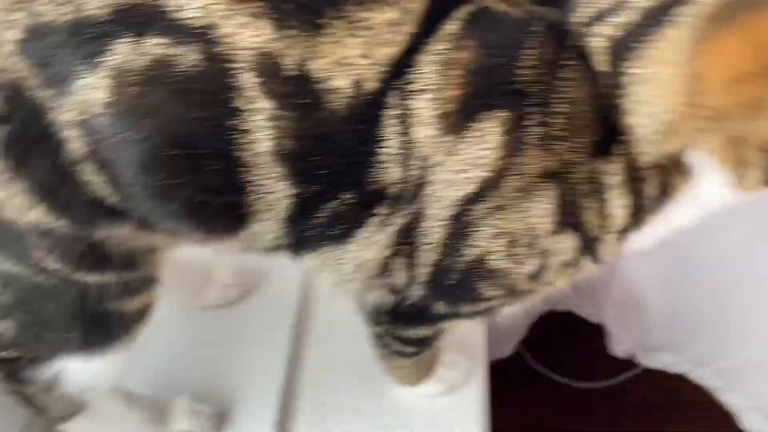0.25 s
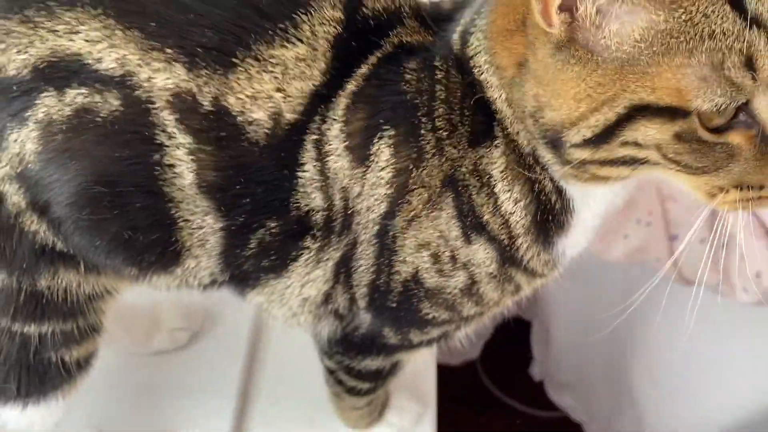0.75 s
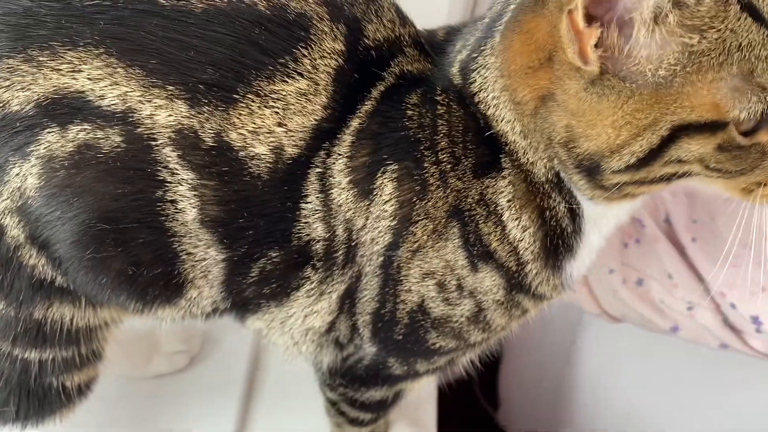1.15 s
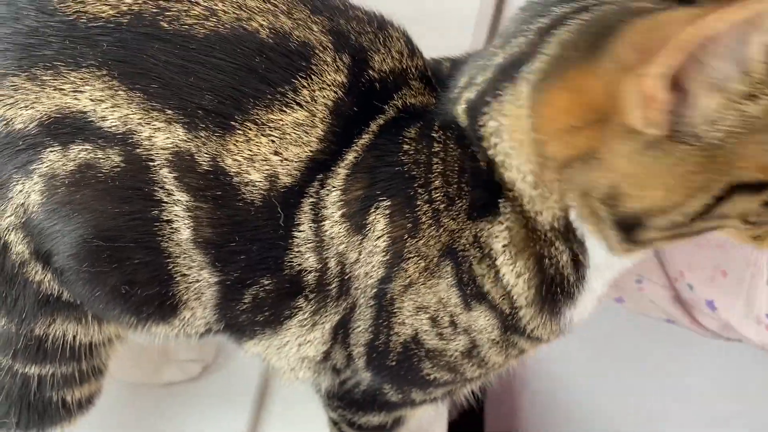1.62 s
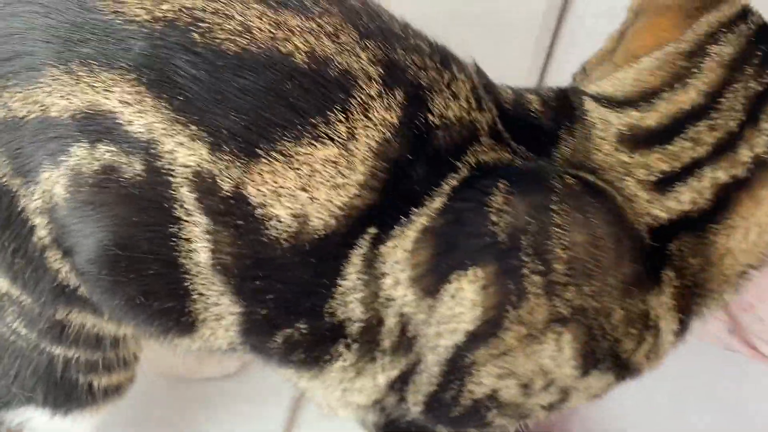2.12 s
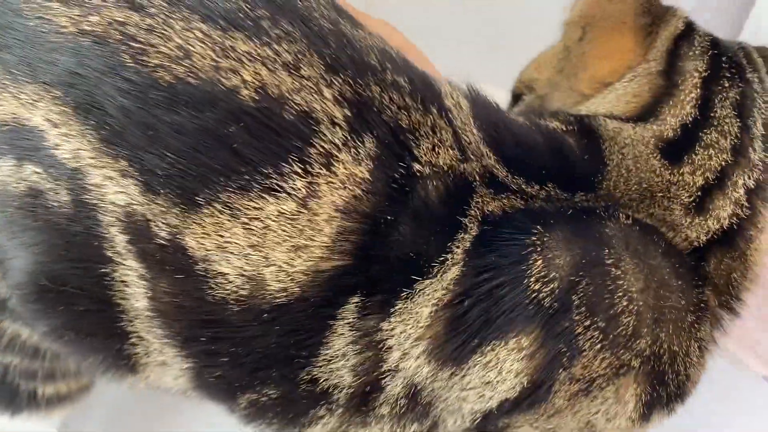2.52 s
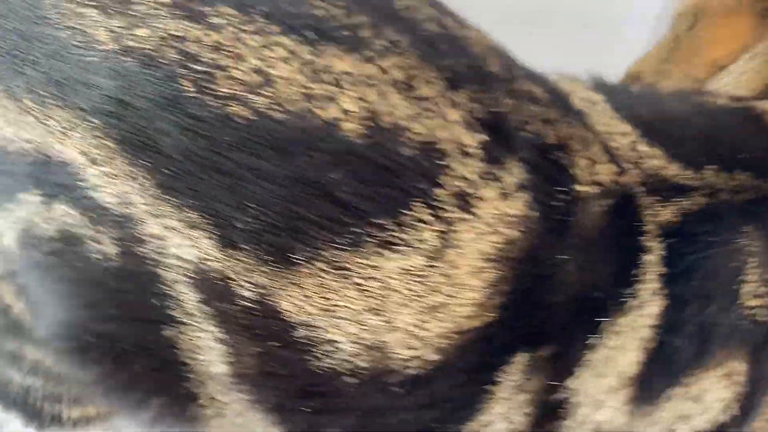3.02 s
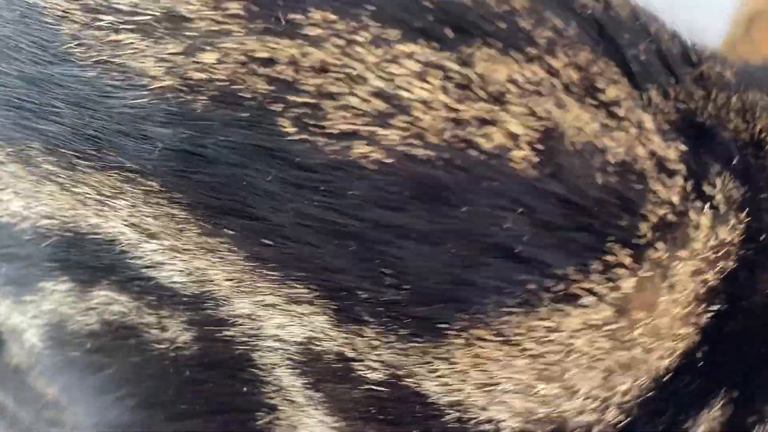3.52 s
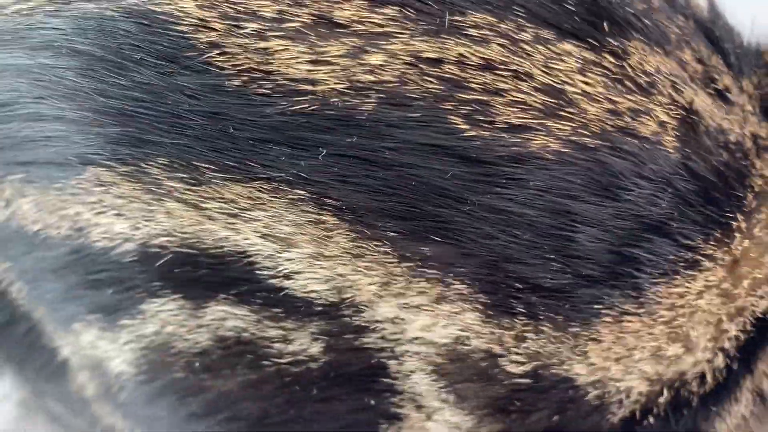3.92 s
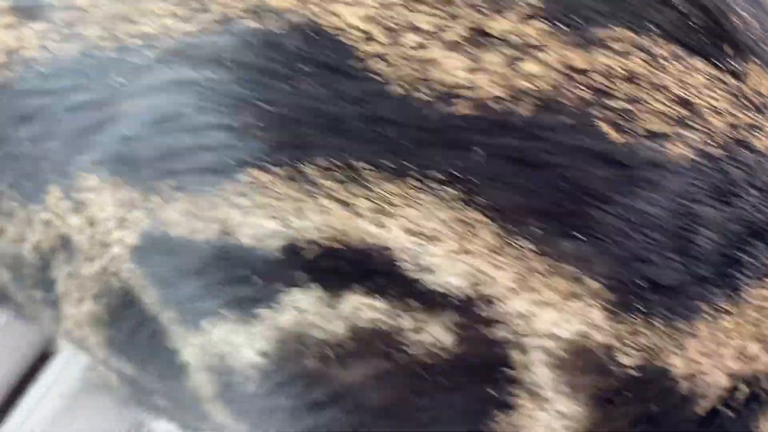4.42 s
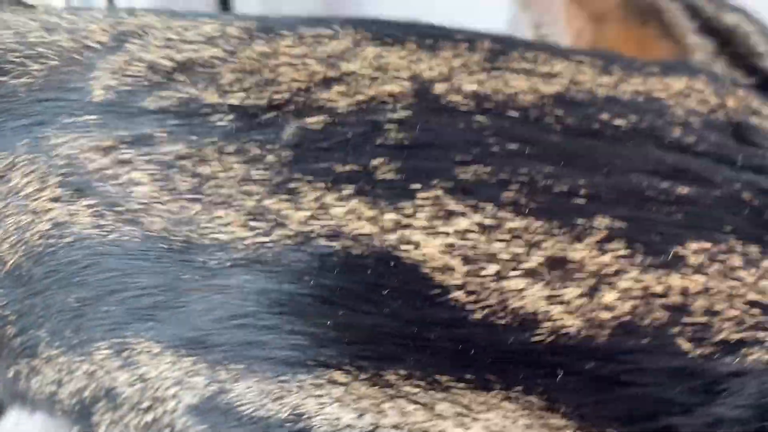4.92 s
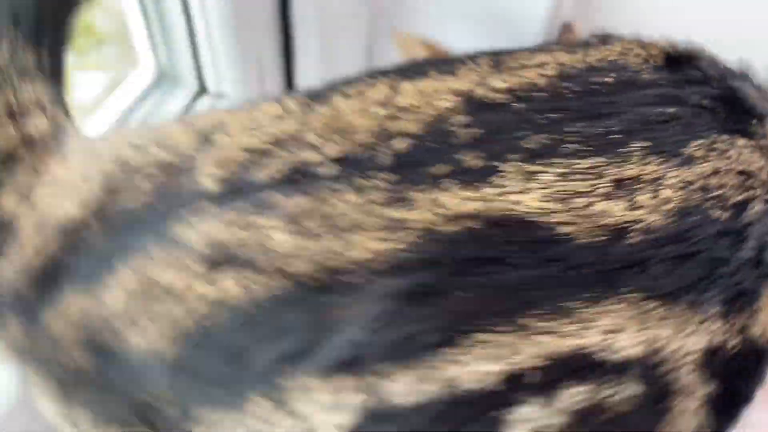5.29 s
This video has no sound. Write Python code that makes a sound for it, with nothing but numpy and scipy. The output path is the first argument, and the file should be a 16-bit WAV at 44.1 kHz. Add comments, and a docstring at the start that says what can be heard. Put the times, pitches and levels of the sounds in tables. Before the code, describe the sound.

Close, low, throbbing purring runs throughout without pause, changing in strength with each breath in and out and getting stronger in the second half. Fur brushes softly around it. The hand knocks the microphone near the start and near the end. Two bright distant cracks, two thin gliding whistles and scattered tiny ticks punctuate it, over a faint low indoor room noise.

```python
"""A cat purrs right at a hand-held microphone indoors, louder as time goes on, while its fur rustles.
At first the hand shifts and bumps the device. The nose hisses in the rhythm of the purr at 0.5 s and 1.4 s,
with a sharp snap at 1.4 s. A faint high whistle glides at 1.8 s, a second snap rings at 3.7 s,
a second whistle follows at 4.1 s, and the hand bumps again at 5.2 s. Small ticks are scattered throughout.
The purr is made of pulses, the air, fur and room of filtered noise, the whistles of gliding sines."""
import sys
import numpy as np
from scipy import signal
from scipy.fft import rfft, irfft
from scipy.io import wavfile
from scipy.ndimage import uniform_filter1d

SR = 44100
rng = np.random.default_rng(int(sys.argv[2]) if len(sys.argv) > 2 else 0)


def pcm_store(signal):
    """Save signal as 16-bit PCM."""
    levels = np.round(np.clip(np.atleast_2d(signal), -1, 1) * 32767)
    wavfile.write(sys.argv[1], SR, levels.astype(np.int16).T)


N = 244755
T = np.arange(N) / SR  # the time of every sample [s]
HZ = np.fft.rfftfreq(N, 1 / SR)  # the frequencies of the whole sound's spectrum [Hz]

# The cat purrs on every breath, in and out:
# (time [s], beats [count], effort [dB], change over the breath [dB], brightness [dB],
#  gap to the second thump [s], size of the second thump [share of the first])
BREATHS = [(0.0215, 12, -57, 2, -2, .011, 1), (0.4449, 11, -53, 0, 3, .011, .55),
           (.83, 7, -52, 13, -1, 0.0093, 0.56), (1.0924, 7, -57, -6, 1, 0.0085, 0.8),
           (1.347, 12, -52.5, -3.5, 3.5, 0.01048, .45), (1.7586, 13, -50, 1, -1.5, 0.011, 0.5),
           (2.2099, 5, -49, -5.5, -2, 0.01, .55), (2.381, 6, -48, -6, -0.5, 0.013, 0.67),
           (2.590, 6, -51.5, -3, 0.5, .009, .5), (2.795, 6, -53, 4, -4.5, .011, 0.37),
           (3.008, 5, -46.5, -2.5, -4.5, 0.011, 0.43), (3.1845, 9, -48.5, -0.5, 0.5, .0116, .85),
           (3.4984, 11, -46, 2, 1.5, 0.012, 0.44), (3.887, 10, -48.5, 2.5, 0, .0108, .7),
           (4.234, 17, -48.5, 1, 4, .012, 0.43), (4.8273, 12, -48.5, -5.5, 0, 0.01106, 0.72),
           (5.248, 9, -47.5, -0.5, -1, 0.011, 0.41)]
LAST_BREATH_ENDS_S, RELEASE_S = 5.578, 0.063  # a breath sinks back over the release time


def purr(shut, delay_cycles=1.077, flutter=0.029, air_above_hz=110, slaps_within_s=0.024, slap_count=4):
    """Each beat of the larynx is a double thump, which the body colours and delays most in the bass."""
    # colour of one thump: (frequency [Hz], level [dB])
    thump = [(25, -24), (50, -5.5), (85, -0.5), (120, 3), (180, 0), (230, -6), (300, -11.5), (420, -12.5),
             (520, -10.5), (620, -17), (750, -32), (950, -55.5), (1300, -65), (4000, -130)]
    *_, gap, second_size = breath_at(shut)
    chance = rng.standard_normal((len(shut), 3))
    slip, first_db, second_db = (chance * [.0004, .8, 1.4]).T  # [s], [dB], [dB]

    # the folds never shut evenly: a few small slaps follow each beat at random
    slaps = shut[:, None] + rng.uniform(0, slaps_within_s, (len(shut), slap_count))
    slap_sizes = .07 * rng.standard_normal(slaps.shape)

    times = np.r_[shut, shut + gap + slip, slaps.ravel()]
    sizes = np.r_[amp(first_db), second_size * amp(second_db), slap_sizes.ravel()]
    inside = (times >= 0) & (times < T[-1])
    pulses = np.bincount((times[inside] * SR).astype(int), sizes[inside], N)

    # turbulent air follows every pulse and fades with a time constant of 9.5 ms
    air_level = signal.lfilter([1], [1, -np.exp(-1 / (0.0095 * SR))], pulses)
    air = air_level * rng.standard_normal(N)
    # the air is too light to shake the chest, so the bass stays clean
    air_share = HZ ** 3 / (HZ ** 3 + air_above_hz ** 3)
    # each frequency arrives about one of its own cycles late
    late = np.exp(-2j * np.pi * delay_cycles * np.log((HZ + 1) / 150))
    thumps = (rfft(pulses) + flutter * rfft(air) * air_share) * amp(across(thump, HZ)[0]) * late

    # four registers, split at 100, 265 and 440 Hz, each with its own level
    flank, chest, throat = (1 / (1 + (HZ / hz) ** 12) for hz in (100, 265, 440))
    parts = (flank, chest - flank, throat - chest, 1 - throat)
    return sum(amp(db) * unit(irfft(thumps * part, N)) for db, part in zip(registers(), parts))


def beats(jitter_s=.0002):
    """The moments at which the vocal folds shut: evenly spread over each breath, with a little jitter."""
    ends = [row[0] for row in BREATHS[1:]] + [LAST_BREATH_ENDS_S]
    shut = np.concatenate([np.linspace(start, end, round(count), endpoint=False)
                           for (start, count, *_), end in zip(BREATHS, ends)])
    return shut + jitter_s * rng.standard_normal(len(shut))


def breath_at(t, turn_before_s=.018):
    """For times t: seconds since and until a turn of the breath, then that breath's columns from effort on."""
    rows = np.array(BREATHS)
    turns = np.r_[rows[:, 0] - turn_before_s, LAST_BREATH_ENDS_S + RELEASE_S]
    k = np.clip(np.searchsorted(turns, t) - 1, 0, len(rows) - 1)
    return np.maximum(t - turns[k], 0), turns[k + 1] - t, *rows[k, 2:].T


def registers(attack_s=0.045, lull_db=-8, upper_follow=1.14):
    """Levels in dB of flank, chest, throat and nose: each breath swells from a lull and sinks back into it."""
    # the colour changes as the flank comes nearer and the head turns, relative to the chest:
    # (time [s], flank [dB], throat [dB], nose [dB])
    nearness = [(.15, -3, -14.5, -16.5), (.6, -12, -48, -16.5), (1.4, -5, -32, -18), (1.9, -13.5, -18, -31),
                (3.0, -3.5, -8.5, -22.5), (3.45, -7, -12.5, -23), (3.8, -2.5, -13, -14),
                (4.6, -9, -13.5, -20), (5.05, -11, -7, -13.5), (5.4, -11, -5, -4)]
    since, until, effort, change, bright, _, _ = breath_at(T)
    lull = lull_db * np.maximum(np.maximum(1 - since / attack_s, 1 - until / RELEASE_S), 0)
    shape = lull + change * (since / (since + until) - .5)
    low = effort + shape
    high = effort + bright + upper_follow * shape  # the upper registers swing further
    flank, throat, nose = along(nearness, T)
    levels = np.array([low + flank, low, high + throat, high + nose])
    return uniform_filter1d(levels, size=441)  # smoothed over 10 ms


def sniffs(shut, puff_at=0.88, puff_width=0.078, steady=0.35, second=0.65):
    """Air hisses through the nose in two puffs a beat, while the folds stand open."""
    # when the nose hisses: (time [s], length [s], level [dB])
    hisses = [(.5, .31, -71.5), (1.385, .27, -76)]
    # colour of the air in the nose: (frequency [Hz], level [dB])
    nose = [(900, -38), (1250, 0.5), (1600, 14), (2000, -1), (3000, -12), (4400, -9.5), (5400, 0.5),
            (6500, -11), (7800, 10), (9000, -13), (10500, 4), (12500, -18), (16000, -39)]
    turn = np.interp(T, shut, np.arange(len(shut))) - puff_at  # place in the rhythm [beats]
    # the weaker puff comes half a beat after the strong one
    strong, weak = (np.exp(-(np.sin(np.pi * (turn - late)) / (np.pi * puff_width)) ** 2) for late in (0, .5))
    puffs = unit(steady + strong + second * weak)
    level = sum(amp(db) * swell(s, length) for s, length, db in hisses)
    return level * colour(patchy(noise(0.5), patchy_db=4.0) * puffs, nose)


def fur(rub_db=-77, fizz_db=-88.5, grain_db=-0.96):
    """Hairs brush past each other: steady noise in a grainy rub and a fine fizz, with strokes on top."""
    # colours of the rub and of the fizz: (frequency [Hz], level [dB])
    rub_colour, fizz_colour = [(300, 17), (800, 8), (1500, 3.5), (2500, 1.5), (4500, -4), (6500, -5),
                               (8000, -18.5), (12000, -39.5)], [(3000, -7.5), (6000, -5.5), (8000, -1), (11000, -2.5),
                                            (13000, -3.5), (16000, -11.5)]
    # longer strokes: (time [s], length [s], soft rub [dB], fine fizz [dB])
    strokes = [(0.022, 0.2, -71.5, -86.5), (1.33, 0.41, -72, -83.5), (2.42, 0.34, -75.5, -97),
               (2.8, 0.17, -95, -78), (4.029, 0.24, -73.5, -95), (4.85, 0.37, -72.5, -94),
               (5.08, .08, -84, -76.5), (5.19, 0.45, -77, -83.5)]
    # short brushes and thin hisses: (time [s], length [s], level [dB], centre [Hz], width [octaves])
    short_brushes = [(0.07, 0.097, -75.5, 3240, 0.28), (0.23, 0.14, -85.5, 6600, 0.062),
                     (0.749, 0.054, -73.5, 954, 0.082), (0.903, 0.2, -83.5, 1620, 0.18),
                     (1.702, 0.35, -73, 670, 0.26), (1.845, 0.032, -75, 980, 0.15),
                     (1.826, 0.24, -78, 2000, 0.61), (1.901, 0.088, -70.5, 5930, 0.26),
                     (2.19, 0.16, -84, 1630, 0.16), (2.44, 0.29, -85.5, 6680, 0.028),
                     (2.72, 0.21, -82, 2600, 0.65)]
    rub = np.hypot(amp(rub_db), sum(amp(db) * swell(s, length) for s, length, db, _ in strokes))
    fizz = np.hypot(amp(fizz_db), sum(amp(db) * swell(s, length) for s, length, _, db in strokes))
    soft = colour(patchy(noise(0.3), patchy_db=3.0) * unit(amp(grain_db * drift(110))), rub_colour)
    fine = colour(patchy(noise(1.0), patchy_db=3.0), fizz_colour)
    grain = patchy(noise(0.41), patchy_db=3.5)
    brushes = sum(amp(db) * swell(s, length) * band(grain, hz, octaves)
                  for s, length, db, hz, octaves in short_brushes)
    return rub * soft + fizz * fine + brushes


def grip_shifts():
    """The hand shifts on the device in low rumbles: bands of noise that swell and sink."""
    # (time [s], length [s], level [dB], centre [Hz], width [Hz])
    shifts = [(0.062, 0.21, -44, 99.8, 34), (1.904, 0.11, -51, 52, 50), (2.162, 0.11, -64, 45.7, 40.23),
              (4.892, 0.12, -48.5, 66.3, 70), (4.955, 0.33, -53, 186, 258), (5.192, 0.085, -55, 57, 51)]
    out = np.zeros(N)
    for s, length, db, hz, width in shifts:
        low_band = 1 / (1 + (2 * (HZ - hz) / width) ** 4)
        rumble = swell(s, length) * irfft(rfft(rng.standard_normal(N)) * low_band, N)
        # the level holds for the rumble's own length, not for the whole sound
        out += amp(db) * unit(rumble) * np.sqrt(length / T[-1])
    return out


def bumps():
    """Two soft bumps ring the case of the device in a few dying sines; a longer contact is duller."""
    # (time [s], level before softening [dB], contact time [s])
    knocks = [(0.207, -26.5, 0.0011), (5.2062, -24.5, 0.0012)]
    # ringing of the case: (frequency [Hz], level [dB], time to fall 60 dB [s])
    case = [(313, 4.5, 0.0065), (547, 0, 0.0098), (1077, -29, 0.071), (1930, -8, 0.022)]
    out = np.zeros(N)
    for s, db, contact in knocks:
        ring = np.zeros(N)
        for k, (hz, mode_db, t60) in enumerate(case):
            ring += (-1) ** k * amp(db + mode_db) * dying(s, t60) * np.sin(2 * np.pi * hz * (T - s))
        push = np.hanning(round(contact * SR))
        out += np.convolve(ring, push / push.sum())[:N]
    return out


def ticks(t60=0.011, wet_db=-9):
    """Small ticks around the cat: tiny dying bursts of noise, each in its own band, with a little room."""
    # (time [s], level [dB], centre [Hz], width to each side [octaves])
    small_ticks = [(1.2289, -45, 2060, 0.73), (1.317, -51, 1650, 0.23), (2.464, -45, 1680, 0.24),
                   (2.462, -62.5, 4360, 0.82), (3.657, -65.5, 2470, 0.48), (3.979, -44.5, 1880, 0.17),
                   (4.125, -54, 1066, 0.5), (4.251, -47.5, 970, 1.06), (4.384, -58, 2680, 0.22),
                   (4.476, -60.5, 2450, 0.5), (4.655, -57, 1870, 0.19), (4.792, -55, 960, 0.65),
                   (4.802, -54, 1710, 0.35), (5.206, -56.5, 7260, 3.7)]
    out, t = np.zeros(N + SR), T[:SR // 10]
    for s, db, hz, octaves in small_ticks:
        edges = np.clip(hz * 2. ** (abs(octaves) * np.array([-1, 1])), 50, .45 * SR)
        sos = signal.butter(3, edges, "band", fs=SR, output="sos")
        grain = signal.sosfilt(sos, rng.standard_normal(len(t)))
        rise = 1 - np.exp(-t * hz)  # a time constant of one over the centre frequency
        out[round(s * SR):][:len(t)] += amp(db - 60 * t / t60) * rise * unit(grain)
    return out[:N] + amp(wet_db) * room(out[:N])


def snaps(t60=0.15, wet_db=-7, ring_db=-22, quick_db=-9, quick_t60=0.098):
    """Two bright cracks farther off: dying noise with a quicker, softer part, ringing sines and the room."""
    # (time [s], level [dB])
    cracks = [(1.39, -50), (3.749, -51)]
    # colour of the noise: (frequency [Hz], level [dB])
    crack_colour = [(150, 7), (400, 7.5), (800, 6.5), (1000, -1.5), (1350, -3), (1800, -5.5), (2300, -12),
                    (2900, -2.5), (3500, -8), (4200, -1.5), (4800, -9), (6000, -11.5), (8000, -7.5),
                    (11000, -9.5), (16000, -18)]
    # the ring: (frequency [Hz], level [dB], time to fall 60 dB [s])
    ring_modes = [(790, -19, 0.091), (960, -13, 0.16), (1230, -25, .13), (1207, 9.5, 0.11),
                  (1355, 11.5, 0.15), (4407, 14.5, 0.07), (4250, 0, 0.12), (4650, -10, 0.1),
                  (4320, -25, .11), (7100, 7, 0.054)]
    burst = sum(amp(db) * (dying(s, t60) + amp(quick_db) * dying(s, quick_t60)) for s, db in cracks)
    crack = colour(patchy(noise(0.99), patchy_db=1.5) * uniform_filter1d(burst, size=64), crack_colour)
    t = T[:SR // 3]
    modes = sum(amp(db - 60 * t / life) * np.sin(2 * np.pi * (hz * t + rng.random()))
                for hz, db, life in ring_modes)
    s, db = np.transpose(cracks)
    strikes = np.bincount((s * SR).astype(int), amp(db + ring_db), N)
    ring = signal.oaconvolve(strikes, modes)[:N]
    return crack + ring + amp(wet_db) * room(crack.mean(0))


def whistles(waver=0.0045, flicker_db=1.5, wet_db=-6, under_start_db=-100, under_end_db=-80.5):
    """Thin gliding sines that waver and flicker; a line an octave below grows as each goes on."""
    # one table for each whistle: (time [s], pitch [Hz], level [dB])
    glides = [
        [(1.83, 5310, -86), (1.885, 6124, -70.5), (1.91, 5850, -88), (1.94, 6210, -77), (1.983, 6040, -66.5),
         (1.994, 6890, -71.5), (2.055, 6780, -66.5), (2.09, 6140, -71), (2.17, 4880, -106)],
        [(4.09, 5834, -86), (4.185, 5820, -94), (4.224, 5830, -75.5), (4.262, 5840, -73), (4.283, 6180, -68.5),
         (4.315, 6120, -69.5), (4.378, 5710, -82), (4.43, 5210, -97)],
    ]
    out = np.zeros(N)
    for rows in glides:
        hz, db = along(rows, T)
        start, end = rows[0][0], rows[-1][0]
        under_db = np.interp(T, [start, end], [under_start_db, under_end_db])
        angle = 2 * np.pi * np.cumsum(hz * (1 + waver * drift(250))) / SR
        fade = np.clip(np.minimum(T - start, end - T) / 0.0047, 0, 1)  # 4.7 ms at each end
        tone = amp(db) * np.sin(angle)
        under = amp(under_db) * (1 + 0.32 * drift(200)) * np.sin(angle / 2)
        out += fade * amp(flicker_db * drift(60)) * (tone + under)
    return out + amp(wet_db) * room(out)


def room_noise(level_db=-58.5):
    """The low, steady noise of the room: coloured noise, much alike at both ports."""
    # (frequency [Hz], level [dB])
    hum = [(20, -12.5), (40, 0.5), (100, 3.5), (200, 2.5), (400, -30.5), (800, -28), (2000, -70.5)]
    return amp(level_db) * colour(noise(0.88), hum)


def room(x, count=6):
    """A small room: a few early echoes in a noisy tail that dies at its own pace at each frequency."""
    # (frequency [Hz], time to fall 60 dB [s])
    decay = [(200, 0.6), (1500, 0.27), (5000, 0.29), (10000, 0.032), (16000, 0.1)]
    taps = rng.standard_normal((2, SR // 2))
    for side in taps:
        side[rng.integers(SR // 400, SR // 40, count)] += 9 * rng.choice([-1, 1], count)
    hz, t, z = signal.stft(taps, SR, nperseg=256)
    tail = signal.istft(z * amp(-60 * t / across(decay, hz)[0][:, None]), SR)[1]
    return signal.fftconvolve(np.atleast_2d(x), tail / np.linalg.norm(tail[0]), axes=1)[:, :N]


def amp(db):
    """Turns decibels into a gain."""
    return 10 ** (np.asarray(db) / 20)


def unit(x):
    """Scales x to an average (rms) level of 1."""
    return x / np.sqrt(np.mean(x ** 2) + 1e-30)


def along(rows, t):
    """Reads the columns of a table over time at times t."""
    s, *columns = np.transpose(rows)
    return [np.interp(t, s, c) for c in columns]


def across(rows, hz):
    """Reads the columns of a table over frequency at frequencies hz."""
    f, *columns = np.transpose(rows)
    return [np.interp(np.log(hz + 1), np.log(f), c) for c in columns]


def colour(x, spectrum):
    """Filters x by a table of (frequency [Hz], level [dB]), keeping the power of white noise."""
    return irfft(rfft(x) * unit(amp(across(spectrum, HZ)[0])), N)


def band(x, hz, octaves):
    """Filters x to a bell-shaped band around hz, keeping the power of white noise."""
    bell = np.exp(-.5 * (np.log2((HZ + 1) / hz) / octaves) ** 2)
    return irfft(rfft(x) * unit(bell), N)


def noise(same):
    """White noise for the two ports, alike by the share same."""
    same = np.clip(same, 0, 1)
    return np.sqrt(same) * rng.standard_normal(N) + np.sqrt(1 - same) * rng.standard_normal((2, N))


def patchy(x, patchy_db, size=512, count=7):
    """Lets the level of a noise wander in patches of about 600 Hz by 20 ms."""
    overlap = size - size // 4
    z = signal.stft(x, nperseg=size, noverlap=overlap)[2]
    field = uniform_filter1d(rng.standard_normal(z.shape[1:]), count, 0)
    field = uniform_filter1d(field, count, 1)
    patched = z * amp(patchy_db * unit(field))
    return unit(signal.istft(patched, nperseg=size, noverlap=overlap)[1][:, :N])


def drift(hz):
    """A random wander of rms 1, with changes up to about hz."""
    return unit(irfft(rfft(rng.standard_normal(N)) * np.exp(-(HZ / hz) ** 2), N))


def swell(s, length):
    """A rounded rise and fall that starts at time s."""
    return np.sqrt(np.maximum(np.sin(np.pi * np.clip((T - s) / length, 0, 1)), 0))


def dying(s, t60):
    """A level curve that jumps to 1 at time s and falls 60 dB in t60 seconds."""
    return (T >= s) * amp(-60 * np.clip((T - s) / t60, 0, 4))


def scene():
    """The cat up close with its echo, small sounds around it, and the low noise of the room."""
    shut = beats()
    cat = purr(shut)
    echo = amp(-17) * room(cat)
    body = cat + echo + sniffs(shut) + fur()
    return body + grip_shifts() + bumps() + ticks() + snaps() + whistles() + room_noise()


def record(dry):
    """The left port is nearer the cat, and the ports differ in phase in the treble; the top is cut off."""
    # the two microphone ports: (frequency [Hz], left minus right [dB], left leads by [radians])
    port_table = [(30, 1.2, 0), (60, 1.6, 0), (110, 2.8, 0), (200, 4, 0), (380, 2.5, .08), (560, 3, .35),
                  (750, 3.3, .25), (2400, 3.6, .25), (4400, 3.5, .2), (7200, 0, -.15), (8200, 0, -1.4),
                  (9000, 0, -3.1), (10500, 0, -5.6), (11700, 0, -6.9), (13000, 0, -9.3), (13800, 0, -9.7),
                  (14700, 0, -12.3), (16000, 0, -12.7)]
    balance_db, lead = across(port_table, HZ)
    ports = np.array([amp(balance_db / 2), amp(-balance_db / 2) * np.exp(-1j * lead)])
    heard = irfft(rfft(dry) * ports, N)
    low_pass = signal.firwin(511, 15800, window=("kaiser", 9), fs=SR)  # edge at 15800 Hz
    return signal.oaconvolve(heard, low_pass[None], "same")


dry = scene()
out = record(dry)
pcm_store(out)
```